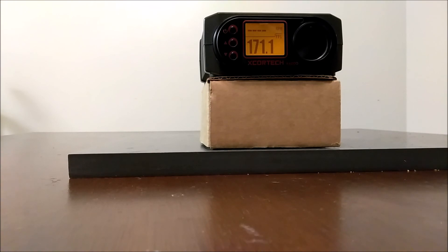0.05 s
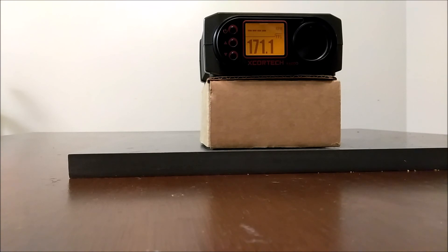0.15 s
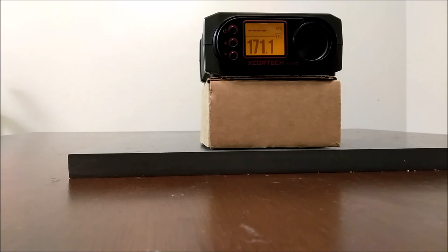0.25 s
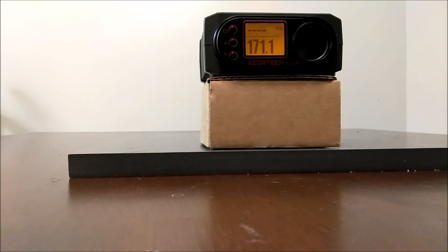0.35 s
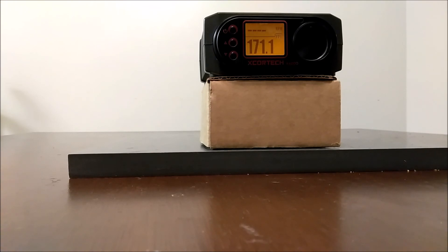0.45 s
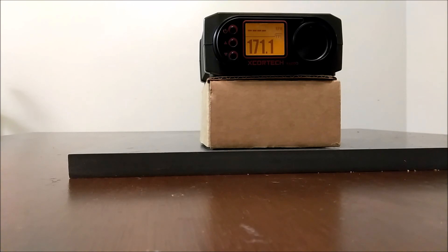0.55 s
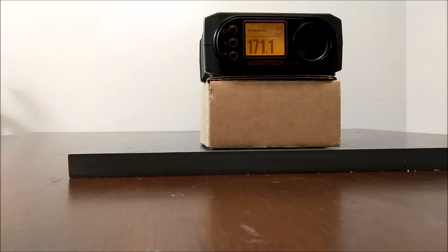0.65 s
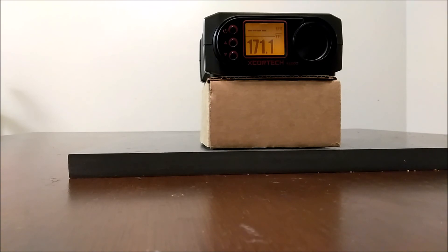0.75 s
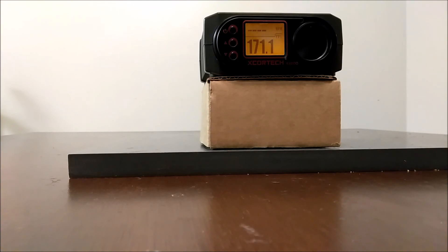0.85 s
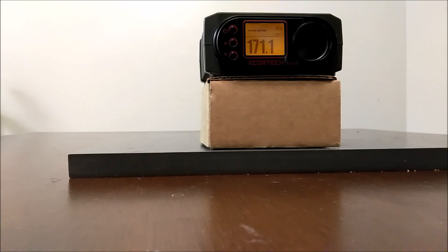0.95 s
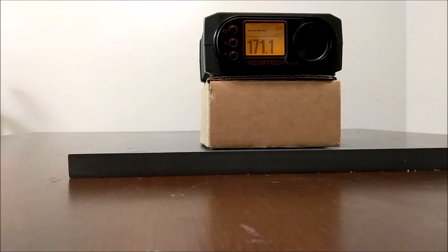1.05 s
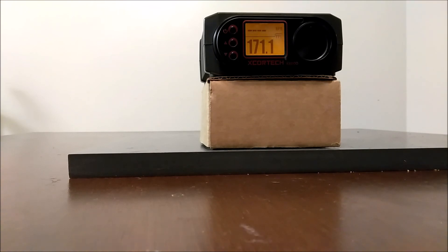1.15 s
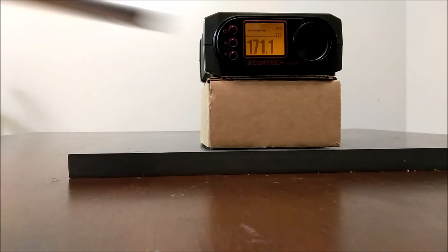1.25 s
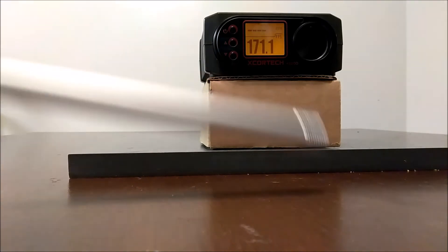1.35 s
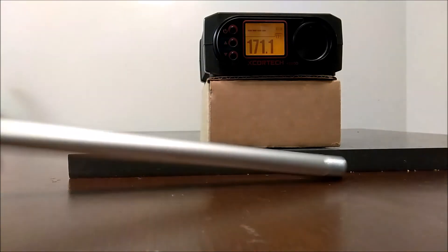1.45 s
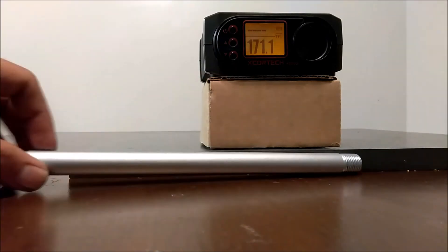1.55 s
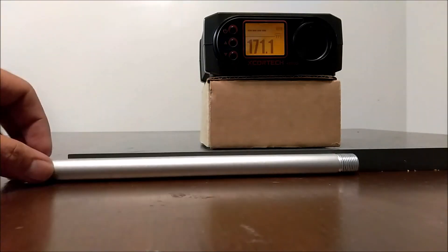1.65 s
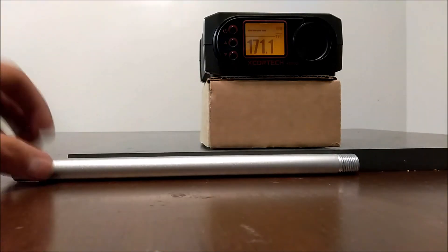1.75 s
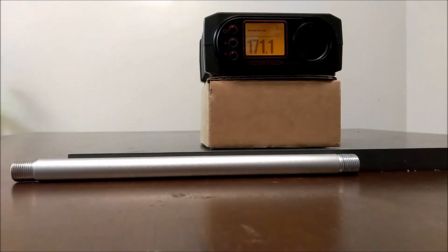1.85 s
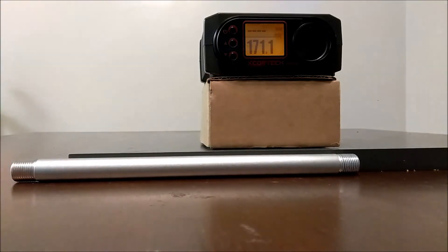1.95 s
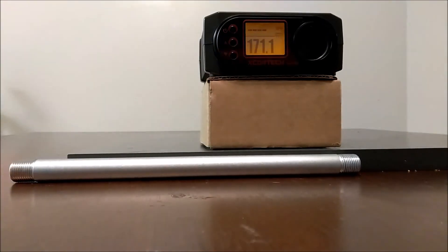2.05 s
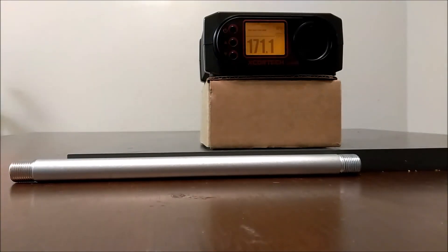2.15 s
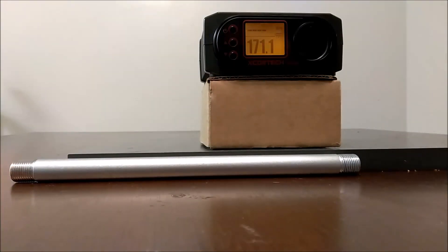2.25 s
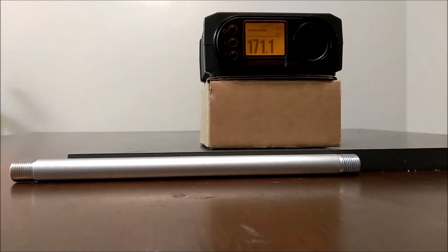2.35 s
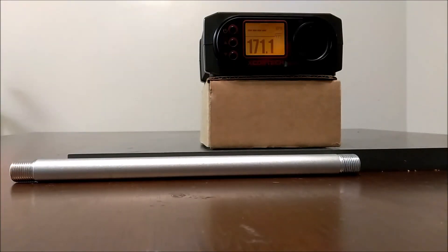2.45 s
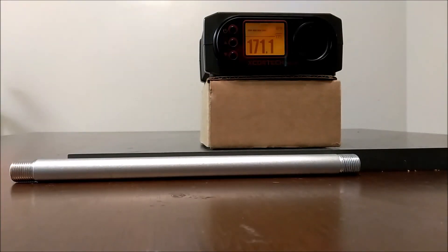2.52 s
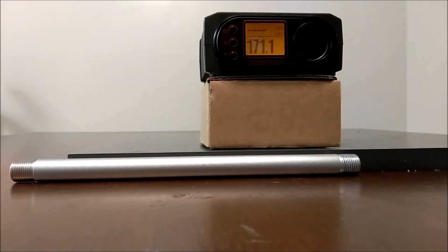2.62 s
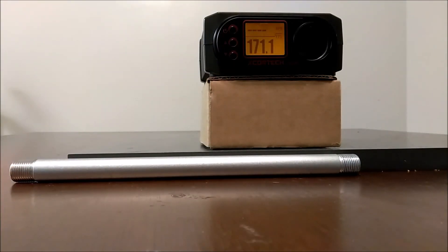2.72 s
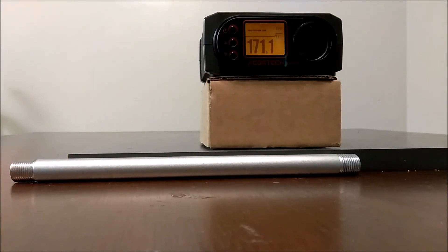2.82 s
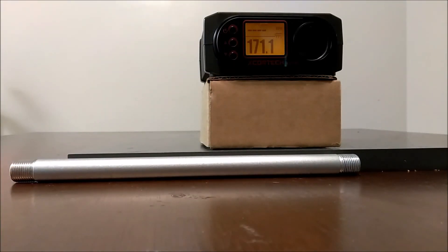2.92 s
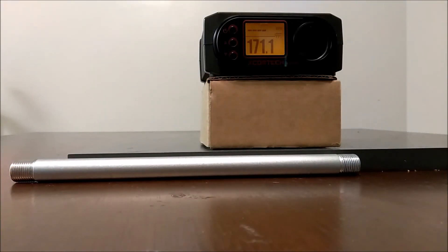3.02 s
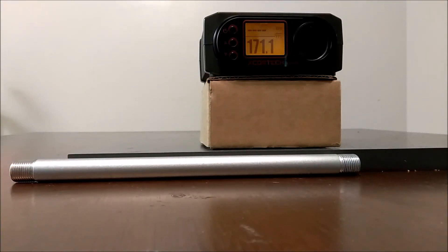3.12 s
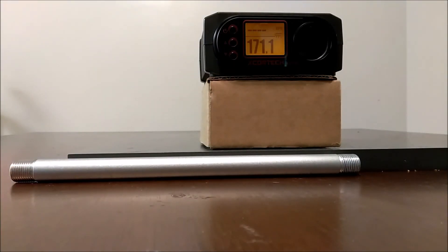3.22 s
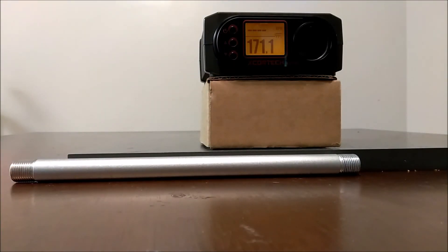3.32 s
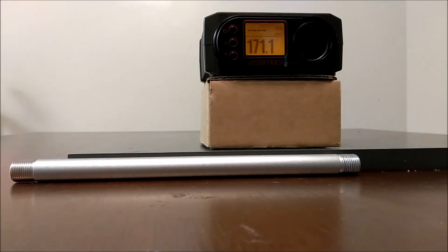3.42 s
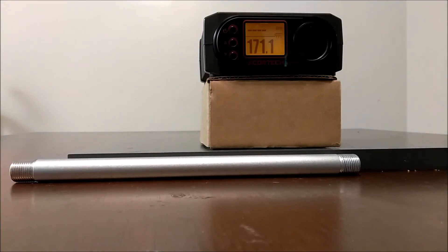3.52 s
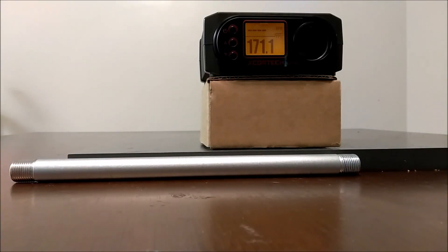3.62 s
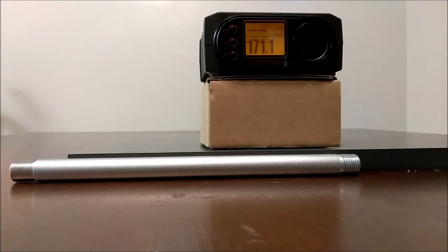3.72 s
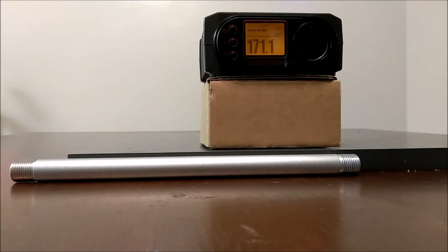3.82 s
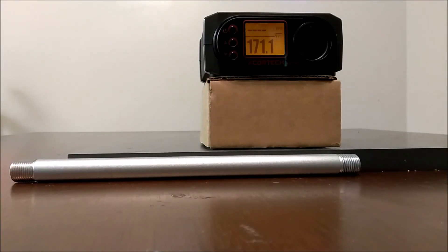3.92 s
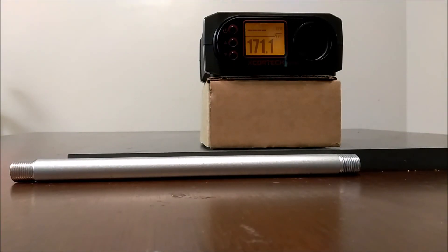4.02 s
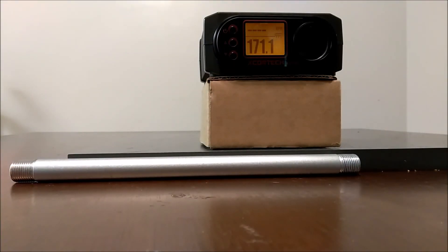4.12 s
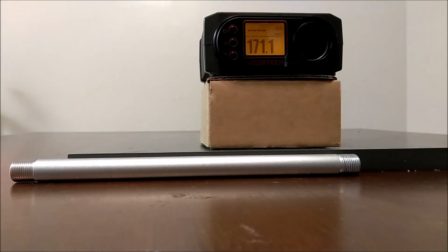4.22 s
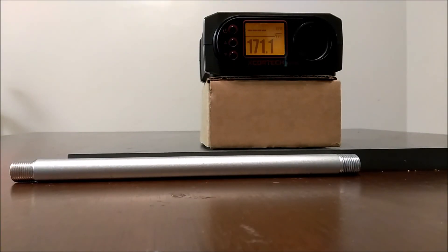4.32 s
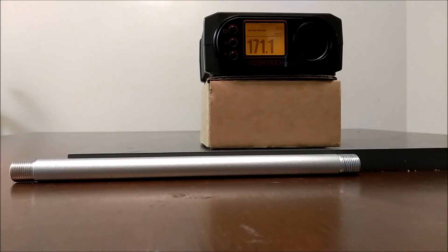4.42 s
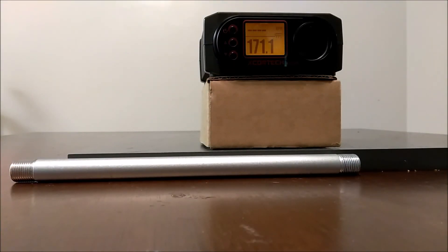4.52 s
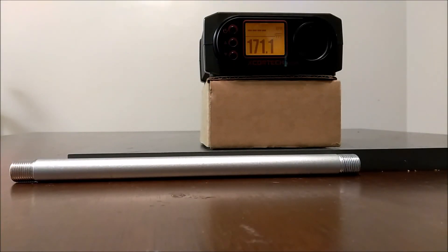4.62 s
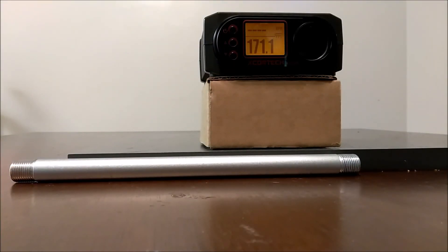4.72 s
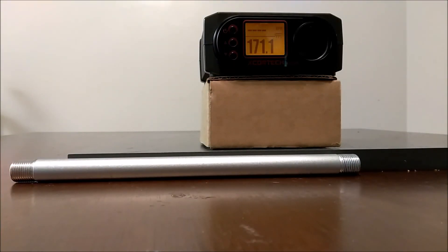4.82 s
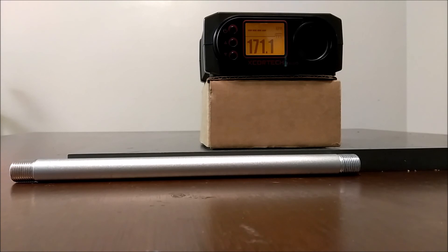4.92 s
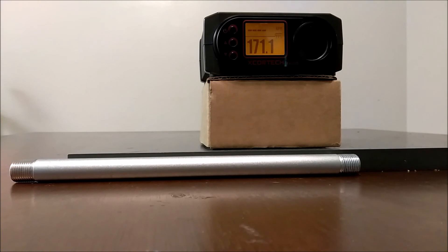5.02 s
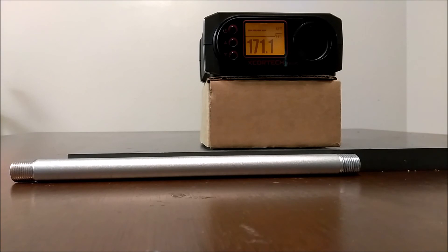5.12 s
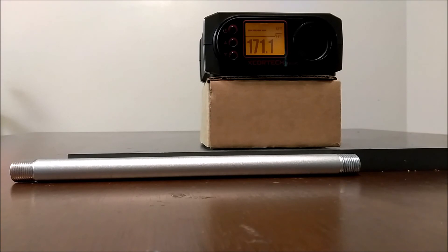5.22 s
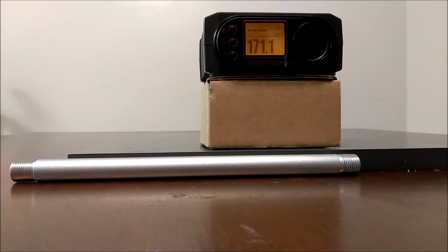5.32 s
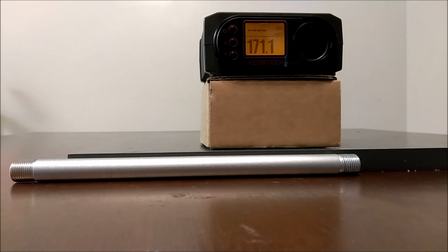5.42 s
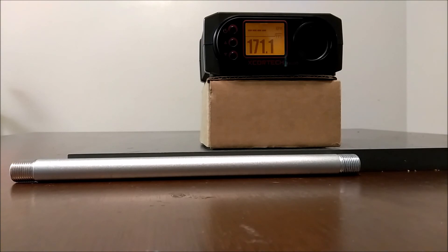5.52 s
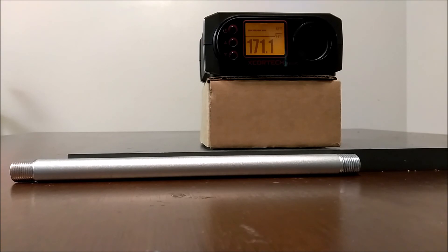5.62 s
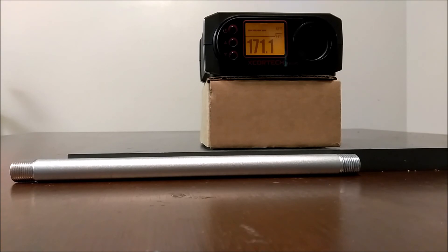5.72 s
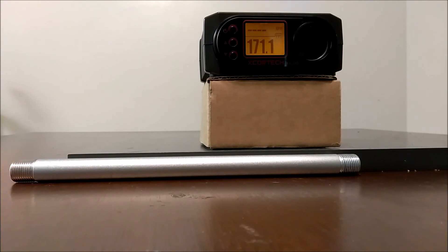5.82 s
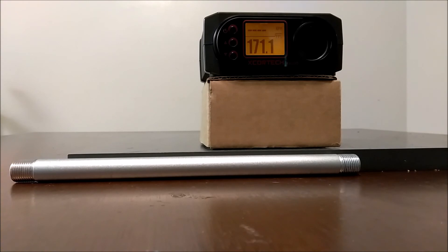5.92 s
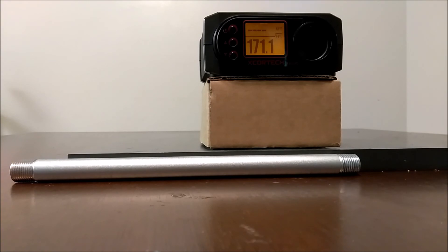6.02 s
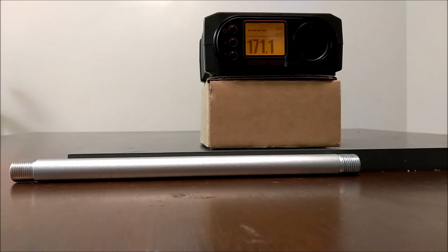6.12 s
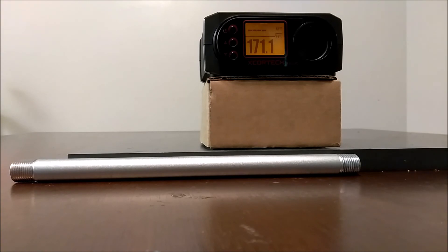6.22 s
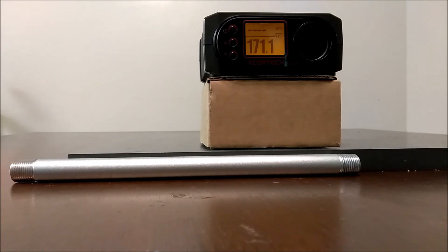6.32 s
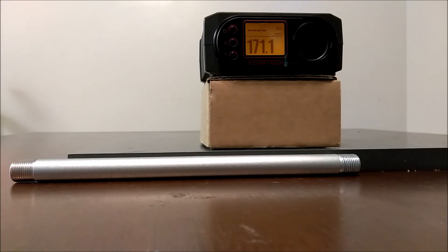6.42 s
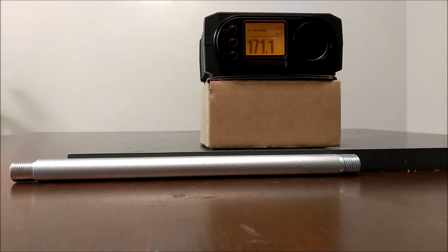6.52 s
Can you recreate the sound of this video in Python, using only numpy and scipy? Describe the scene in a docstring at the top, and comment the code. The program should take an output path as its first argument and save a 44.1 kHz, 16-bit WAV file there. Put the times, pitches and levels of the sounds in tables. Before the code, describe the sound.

Hard plastic clicks of a toy blaster being handled, a metal tube clacks onto a wooden table, then scrapes, twists and clicks follow indoors.

```python
"""Sharp clicks of a hollow plastic shell come first, over a faint steady rumble: a toy blaster being handled.
Its metal barrel is worked out and laid on a wooden table, then another is slid in, seated and twisted tight.
The shell's sounds are bursts of noise shaped by its resonances; table and tube ring as fading sine waves.
A small, lively room, made of fading noise, answers the toy and the barrel."""
import sys
import numpy as np
from scipy import signal
from scipy.fft import rfft, irfft
from scipy.io import wavfile

SR = 44100
rng = np.random.default_rng(int(sys.argv[2]) if len(sys.argv) > 2 else 0)


def unload_audio(sound):
    """Save the sound as a 16-bit wav file, at the path given as the first command line argument."""
    columns = np.transpose(np.atleast_2d(sound))
    # keep every value between -1 and 1, then stretch to whole-number steps
    steps = np.round(np.clip(columns, -1, 1) * 32767)
    wavfile.write(sys.argv[1], SR, steps.astype(np.int16))


N = 289376  # length of the scene in samples
SIZE = 16384  # length of one short sound in samples
AGE = np.arange(SIZE) / SR  # seconds since a short sound began
FREQS = np.arange(SIZE // 2 + 1) * SR / SIZE + 1e-3  # Hz, kept above zero for the logarithm


def undb(db):
    """Turn decibels into a gain."""
    return 10 ** (np.asarray(db) / 20)


def unit(x):
    """Scale to a total energy of one."""
    return x / np.sqrt(np.sum(x ** 2))


def fade(t60_s):
    """Die away smoothly, 60 dB down after t60_s seconds (at least 1 ms)."""
    return np.exp(-np.log(1000) * AGE / max(t60_s, 1e-3))


def along(points):
    """Join (Hz, value) points by straight lines on a log-frequency axis."""
    hz, value = np.transpose(points)
    return np.interp(np.log(FREQS), np.log(hz), value)


def causal(gain):
    """Make the most compact impulse response with this gain curve (minimum phase)."""
    cepstrum = irfft(np.log(gain + 1e-6))
    cepstrum[1:SIZE // 2] *= 2
    cepstrum[SIZE // 2 + 1:] = 0
    return irfft(np.exp(rfft(cepstrum)))


def through(x, response):
    """Filter x by an impulse response."""
    return signal.fftconvolve(x, response)[:len(x)]


def butter(order, hz, kind):
    """Design a low-pass or high-pass filter."""
    return signal.butter(order, hz, kind, fs=SR, output="sos")


def add(track, start_s, sound):
    """Mix a sound into the track at start_s seconds."""
    start = min(max(int(start_s * SR), 0), N)
    track[start:start + len(sound)] += sound[:N - start]


# how alike left and right are in the rumble and the echo: pitch_hz, correlation (-1 to 1)
LEFT_RIGHT_LIKENESS = [(60, -0.43), (130, -0.22), (290, -0.35), (640, -0.66), (1400, -0.2), (3000, 0.17),
                       (16000, -0.23)]


def diffuse(colour, count):
    """Noise arriving from all sides: a shared part and an opposed part set how alike left and right are."""
    likeness = np.clip(along(LEFT_RIGHT_LIKENESS), -0.95, 0.95)
    gain = undb(along(colour))
    mid = through(rng.standard_normal(count), causal(gain * np.sqrt(1 + likeness)))
    side = through(rng.standard_normal(count), causal(gain * np.sqrt(1 - likeness)))
    return np.array([mid + side, mid - side])


# tone colour of the room rumble: pitch_hz, relative level_db (per Hz)
RUMBLE_COLOUR = [(25, -12.5), (60, -10), (110, 0), (200, -6.5), (400, -5), (1000, -14.5), (3000, -28),
                 (8000, -30.5), (16000, -36.5)]


def rumble(level_db=-66):
    """Steady noise, strongest in the bass; level_db is its average level over both channels."""
    return unit(diffuse(RUMBLE_COLOUR, count=N)) * np.sqrt(2 * N) * undb(level_db)


# resonances of the hollow shell: pitch_hz, width_hz, level_db
SHELL_RESONANCES = [(709, 117, 0), (939, 79, 1.5), (1192, 120, 6.5), (1250, 420, -1), (1613, 170, 1.5),
                    (1775, 48, 0), (2200, 100, -11), (2505, 190, -9.5), (3250, 530, -11),
                    (3580, 150, -24.5), (4430, 760, -12), (5800, 1600, -14.5)]
# crack of hard plastic between its resonances: pitch_hz, level_db
PLASTIC_CRACK = [(60, -51), (300, -21.5), (520, -14.5), (1000, -2.5), (3000, -10), (7000, -17),
                 (11000, -20.5), (16000, -25)]


def shell_bands(low_hz=3000, high_hz=7500):
    """Power response of the shell, split into low, middle and treble parts of equal power."""
    power = undb(along(PLASTIC_CRACK)) ** 2
    for hz, width_hz, db in SHELL_RESONANCES:
        power = power + undb(db) ** 2 / (1 + ((FREQS - hz) / width_hz) ** 2 * 2) ** 2
    low = 1 / (1 + (FREQS / low_hz) ** 8)
    below_treble = 1 / (1 + (FREQS / high_hz) ** 8)
    shares = (low, (1 - low) * below_treble, 1 - below_treble)
    return [power * share / np.mean(power * share) for share in shares]


def shell(push, bands, middle_db, treble_db, spot_db=3.5, spot_hz=220):
    """The shell answers a push: the given middle and treble, uneven at random as each spot favours other modes."""
    low, middle, treble = bands
    power = low + undb(middle_db) ** 2 * middle + undb(treble_db) ** 2 * treble
    spot = undb(spot_db * np.interp(FREQS / spot_hz, np.arange(256), rng.standard_normal(size=256)))
    return through(push, causal(np.sqrt(power) * spot))


def colour_of(hardness_db, middle_share=0.38):
    """Middle and treble levels: soft contacts lose mostly treble, hard ones gain in both alike."""
    middle_db = max(middle_share * hardness_db, hardness_db)
    return middle_db, hardness_db


def grit(spread_db):
    """Dense tiny contacts of uneven size."""
    size_db = spread_db * np.minimum(rng.exponential(size=SIZE), 5)
    return rng.standard_normal(SIZE) * undb(size_db)


def contact(t60_s, snap=0.29, rise_s=0.00064, burst=0.23, burst_t60_s=0.0036):
    """A first touch and a hard burst, then fine rattling that dies away."""
    envelope = (fade(t60_s) + burst * fade(burst_t60_s)) * (1 - np.exp(-AGE / rise_s))
    push = unit(grit(2.87) * envelope)
    push[0] = snap
    return unit(push)


def click(bands, level_db, hardness_db, rattle_t60_s=0.035):
    """One catch or thread slips a notch and makes the shell answer."""
    return undb(level_db) * shell(contact(rattle_t60_s), bands, *colour_of(hardness_db))


# single clicks of the shell: start_s, relative level_db (energy), hardness_db (treble against low band)
SHELL_CLICKS = [(0.007, -2, 2), (0.058, -12, -7), (0.116, -9.5, -5), (0.150, -11, -6.5),
                (0.373, -13.5, -23), (0.407, -14, -10.5), (0.501, -9.5, -8.5), (0.536, -15.5, -7),
                (0.565, -1, -3.5), (0.678, -11.5, -5), (0.752, -17.5, -21), (0.871, -12, -2.5),
                (0.911, -5, -11), (1.007, -4.5, -5), (1.055, -8, -11), (1.087, -5.5, -6),
                (1.127, -11.5, -4), (1.166, -17.5, 14.5), (1.986, -36.5, -3.5), (2.033, -33.5, 3.5),
                (2.634, -19.5, -7), (2.828, -18.5, 6), (2.846, -12, 4.5), (3.074, -19.5, -0.5),
                (3.153, -7, -10.5), (3.214, -18, -5), (3.241, -13.5, -15.5), (3.413, -23.5, -1),
                (3.477, -5.5, -14.5), (3.641, -9, -5), (3.657, -7, -6), (4.041, -11.5, -9.5),
                (4.076, -10.5, -6.5), (4.137, -7.5, -17), (4.163, -21, -36), (4.293, -10.5, -10),
                (4.314, -14.5, -32), (4.490, -28, -20), (4.550, -25.5, -9), (4.593, -17.5, -44),
                (4.653, -25.5, -17.5), (4.771, -20.5, -23), (4.837, -22.5, -23), (5.078, -16, -11),
                (5.102, -18, -12), (5.124, -10, -18), (5.264, -16.5, -14), (5.312, -10, -15),
                (5.467, -15.5, -29), (5.479, -15, -13), (5.585, -19.5, -16), (5.650, -6.5, -10),
                (5.794, -14.5, -8.5), (5.835, -8, -19.5), (6.002, -11.5, -32), (6.186, -16.5, -7.5),
                (6.223, -12.5, -27), (6.287, -21, -15), (6.320, -15.5, -21), (6.413, -18.5, -20),
                (6.436, -13, -23), (6.513, -14.5, -10), (6.520, -16, 1)]


def clicks(bands, strength_db=-1, rebound_db=-16.5, rebound_dull_db=-8):
    """Catches and threads slip one notch; the loose part falls back once, weaker and duller."""
    out = np.zeros(N)
    shortest_s, longest_s = 0.012, 0.045
    delays = shortest_s + (longest_s - shortest_s) * rng.random(len(SHELL_CLICKS))
    for (start_s, db, hardness_db), delay_s in zip(SHELL_CLICKS, delays):
        add(out, start_s, click(bands, db, hardness_db))
        add(out, start_s + delay_s, click(bands, db + rebound_db, hardness_db + rebound_dull_db))
    return undb(strength_db) * out


# tone colour of the room's echo: pitch_hz, relative level_db
ECHO_COLOUR = [(100, 0), (400, 4.5), (1000, 1.5), (2000, 9.5), (4000, 1.5), (8000, 3), (16000, 2.5)]


def room(low_t60_s=0.23, high_t60_s=0.25, split_hz=3500, build_s=0.0018):
    """Small-room echo: noise that builds within milliseconds, then fades, the treble slightly slower."""
    echo = diffuse(ECHO_COLOUR, count=SIZE)
    low = signal.sosfiltfilt(butter(2, split_hz, "low"), echo)
    fading = low * fade(low_t60_s) + (echo - low) * fade(high_t60_s)
    return unit(fading * (1 - np.exp(-(AGE / build_s) ** 2)))


def place(front, back, wet_db, split_hz=1700, lag_samples=4, port_db=3.6):
    """Two faces of an object radiate unlike fine detail. The two ports share the lows, a moment apart and
    in opposite polarity, but each hears the treble of its own face; both faces fill the room."""
    low, high = butter(3, split_hz, "low"), butter(3, split_hz, "high")
    shared_low = signal.sosfilt(low, front)
    left = shared_low + signal.sosfilt(high, back)
    right = signal.sosfilt(high, front) - shared_low
    direct = np.array([np.pad(left, (lag_samples, 0))[:N], right])
    echoes = [np.array([through(face, side) for side in room()]) for face in (front, back)]
    echo = sum(echoes) / np.sqrt(2)
    # port_db is how much louder left is than right
    balance = undb(np.array([[port_db], [-port_db]]) / 2)
    return (direct + undb(wet_db) * echo) * balance


# pushes and twists: start_s, length_s, relative catch level_db (energy), rub level_db, hardness_db of the rub
PUSHES_AND_TWISTS = [(0.323, 0.082, -11, -53.5, 0), (1.077, 0.11, -1, -41.5, 3.5),
                     (2.195, 0.11, -26, -59.5, -17), (2.726, 0.09, -14, -42.5, -6),
                     (2.756, 0.25, -15, -43.5, -1.5), (2.894, 0.067, -7.5, -37, -1.5),
                     (2.926, 0.24, -23, -51, -11), (3.357, 0.074, -17, -47, -5),
                     (3.439, 0.08, -25, -45, -5), (3.492, 0.088, -5.5, -43, 1.5),
                     (3.614, .085, -20.5, -34.5, -4.5), (3.864, .08, -23, -48, 0.5),
                     (4.186, 0.098, -11.5, -55.5, 0), (4.396, 0.18, -15.5, -58.5, -15),
                     (5.032, 0.099, -27, -51.5, -1.5), (5.212, .055, -20, -55, 1),
                     (5.404, 0.057, -9, -51, -3), (5.566, 0.094, -15, -56.5, -7.5),
                     (5.759, 0.08, -16.5, -57, -3), (5.939, 0.095, -17.5, -48.5, -2.5),
                     (6.12, 0.097, -17, -48.5, -5), (6.373, 0.094, -19.5, -44.5, -9.5)]


def slides(bands, catch_db=5.5, catch_hz=260, swell=0.75, breakaway_db=-1, catch_dull_db=-9.5):
    """A part breaks free with a dull click, then sticks and slips: a gritty rub that swells and stops."""
    out = np.zeros(N)
    peak_share = 0.47  # the rub peaks after this share of its length
    for start_s, length_s, click_db, db, hardness_db in PUSHES_AND_TWISTS:
        add(out, start_s, click(bands, click_db + breakaway_db, hardness_db + catch_dull_db))
        pressure = np.interp(AGE / length_s, [0, peak_share, 1], [0, 1, 0]) ** swell
        wander = np.interp(AGE * catch_hz, np.arange(SIZE), rng.standard_normal(SIZE))
        rub = unit(grit(3.8) * undb(catch_db * wander)) * np.sqrt(SIZE)
        add(out, start_s, undb(db) * shell(rub * pressure, bands, *colour_of(hardness_db)))
    return out


def ring(modes):
    """Fading sines of a struck object; each mode's level is its energy before all are scaled together."""
    total = np.zeros(SIZE)
    for hz, db, t60_s in modes:
        sine = unit(np.sin(2 * np.pi * hz * AGE) * fade(t60_s))
        total += rng.choice([-1, 1]) * undb(db) * sine
    return unit(total)


# parts knocking home: start_s, level_db (energy), middle_db, treble_db, chatter_s, cavity_hz,
# cavity_db (against the row's level)
PARTS_KNOCKING_HOME = [(0.924, 3, -1.5, -3, 0.029, 1080, -8), (2.392, 1, -2.5, -0.5, 0.033, 1330, -6),
                       (3.675, 0, 2, -3, 0.019, 1181, 0.5)]


def snaps(bands, first_blow=0.27, cavity_t60_s=0.065):
    """A part hits its stop, chatters briefly and rings the cavity behind it."""
    out = np.zeros(N)
    for start_s, db, middle_db, treble_db, chatter_s, cavity_hz, cavity_db in PARTS_KNOCKING_HOME:
        rattle = unit(grit(1.8) * np.exp(-(AGE / chatter_s) ** 2))
        chatter = unit(rattle + first_blow * contact(0.0054))
        cavity = undb(cavity_db) * ring([(cavity_hz, 0, cavity_t60_s)])
        add(out, start_s, undb(db) * (shell(chatter, bands, middle_db, treble_db) + cavity))
    return out


def tones(rows, rise_s):
    """Single modes set ringing by a push that lasts about rise_s seconds."""
    out = np.zeros(N)
    for start_s, hz, db, t60_s in rows:
        tone = ring([(hz, 0, t60_s)]) * (1 - np.exp(-(AGE / rise_s) ** 2))
        add(out, start_s, undb(db) * unit(tone))
    return out


# parts left ringing by a knock: start_s, pitch_hz, level_db (energy), t60_s (time to fade by 60 dB)
RINGING_PARTS = [(0.925, 4204, -4, 0.14), (0.94, 4086, -6, .06), (1.127, 3650, 0.5, 0.03),
                 (2.392, 1475, -16, 0.055), (2.393, 1635, -7, 0.022), (3.678, 8510, -7.5, .06),
                 (3.678, 1770, -8.5, 0.019), (6.52, 9600, -10.5, 0.0079)]


def pings():
    """Knocked parts ring on, each at one pitch."""
    return tones(RINGING_PARTS, rise_s=0.00047)


def blaster(bands):
    """Everything that the toy itself radiates."""
    return clicks(bands) + slides(bands) + snaps(bands) + pings()


def bounces(count=5, drop_s=1.685, first_gap_s=0.0054, gap_ratio=0.86):
    """The dropped end strikes equally hard at ever shorter gaps; rows as in BARREL_LANDINGS."""
    wood_db, clack_db, ring_db = -9.5, 5.5, 5
    start_s, rows = drop_s, []
    for k in range(count):
        rows.append((start_s, wood_db, clack_db, ring_db))
        start_s += first_gap_s * gap_ratio ** k
    return rows


# the held barrel touching the table: start_s, wood_db (before bass loss), clack_db (metal), ring_db (tube)
BARREL_LANDINGS = [(1.451, 2, -7.5, -15), (1.474, -5.5, -18.5, -20), (1.521, -10, -29, -24.5),
                   (1.566, -22.5, -35, -20), (1.588, -24.5, -34.5, -26.5), (1.774, -37.5, -12.5, -17)]
# table top: pitch_hz, relative level_db, t60_s (time to fade by 60 dB)
TABLE_MODES = [(416, -12, 0.036), (672, -4, 0.11), (989, 0.5, 0.047), (1142, 0.5, 0.048), (1430, -2, 0.021),
               (1842, -3.5, 0.026), (2000, -9.5, .012), (2686, -8.5, 0.0069), (3300, -6.5, 0.0057),
               (4660, -5.5, 0.0029)]
# metal tube, damped by the fingers: pitch_hz, relative level_db, t60_s
TUBE_MODES = [(3637, -10.5, .1), (7867, 6, 0.06), (8149, 10, 0.055), (14869, 4, .13), (14932, 2, 0.13)]
# metal edge on the hard surface: pitch_hz, relative level_db
METAL_EDGE = [(50, -25.5), (200, -3.5), (500, 0.5), (1500, -10), (3500, 0.5), (6000, 1.5), (9000, -1.5),
              (12000, -6.5), (16000, 1.5)]


def barrel(radiate_hz=340, rattle_t60_s=0.027):
    """The tip touches first; then the other end drops and chatters. Returns the knocks and the tube's ring."""
    wood, clack, tube = np.zeros((3, N))
    edge = unit(causal(undb(along(METAL_EDGE))))
    for start_s, wood_db, clack_db, ring_db in BARREL_LANDINGS + bounces():
        add(wood, start_s, undb(wood_db) * ring(TABLE_MODES))
        add(clack, start_s, undb(clack_db) * through(contact(rattle_t60_s), edge))
        add(tube, start_s, undb(ring_db) * ring(TUBE_MODES))
    # the table top radiates little bass into the air
    wood = signal.sosfilt(butter(2, radiate_hz, "high"), wood)
    return clack + wood, tube


# dull bumps through the table: start_s, pitch_hz, level_db (energy, on the left), t60_s
TABLE_BUMPS = [(1.451, 156, -31, 0.035), (1.688, 165, -6, 0.021), (3.677, 85, -32, 0.045),
               (4.684, 111, -24, 0.078)]


def bumps():
    """Low, softly starting tones through the table, weaker on the right."""
    return tones(TABLE_BUMPS, rise_s=0.007) * np.array([[1], [0.3]])


def scene():
    """The blaster is handled and the barrel lands on the table, over the rumble."""
    bands = shell_bands()
    toy = place(blaster(bands), blaster(bands), wet_db=-0.5)
    (knocks, tube), (knocks_back, tube_back) = barrel(), barrel()
    landing = place(knocks, knocks_back, wet_db=2.0) + place(tube, tube_back, wet_db=-7)
    return rumble() + toy + landing + bumps()


def record(dry, ceiling=0.6, top_hz=16000):
    """The recorder rounds the highest peaks and cuts the top."""
    rounded = ceiling * np.tanh(dry / ceiling)
    return signal.sosfilt(signal.ellip(10, 0.2, 70, top_hz, fs=SR, output="sos"), rounded)


dry = scene()
out = record(dry)
unload_audio(out)
```